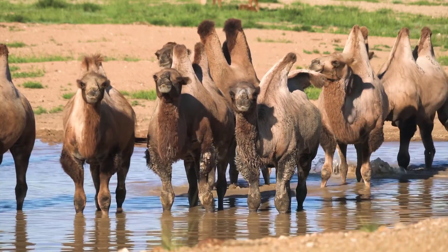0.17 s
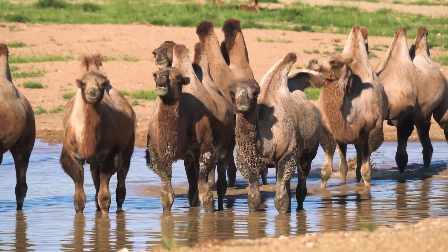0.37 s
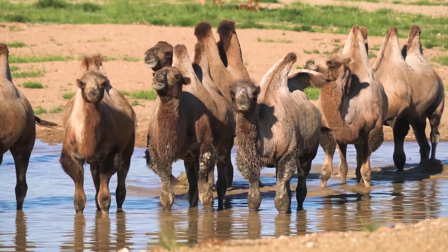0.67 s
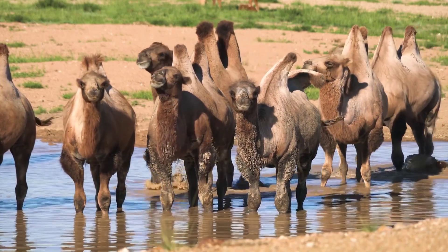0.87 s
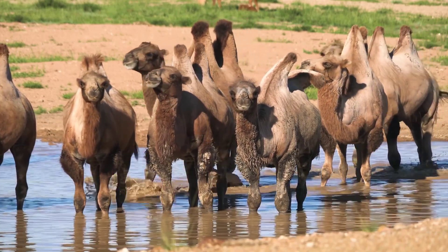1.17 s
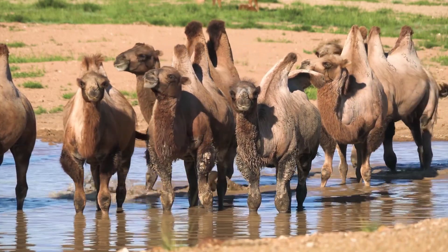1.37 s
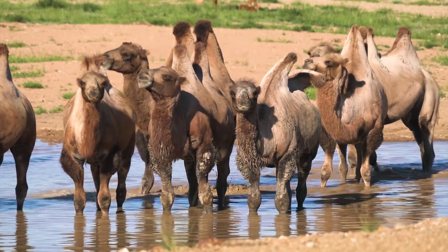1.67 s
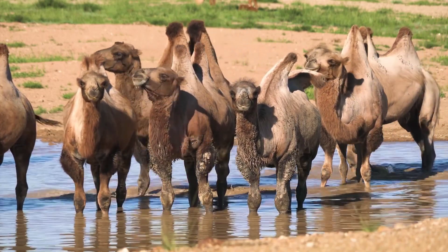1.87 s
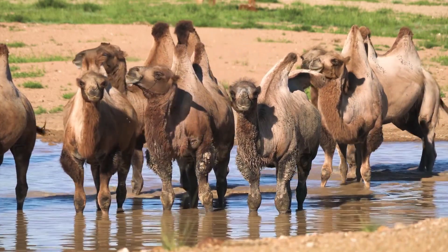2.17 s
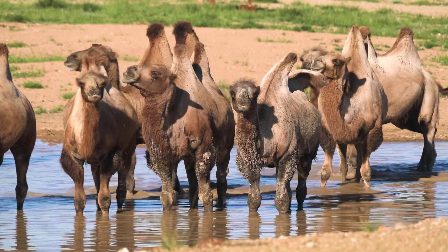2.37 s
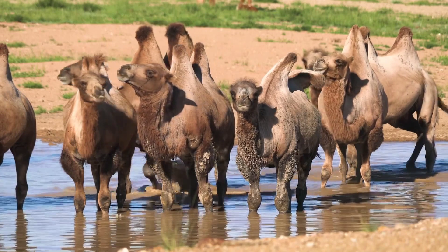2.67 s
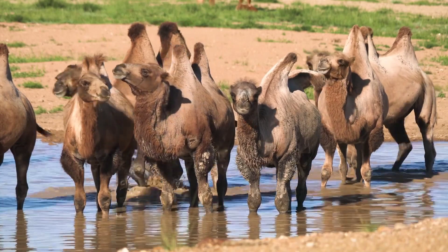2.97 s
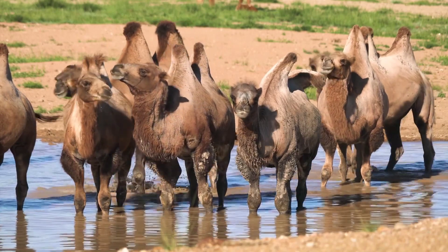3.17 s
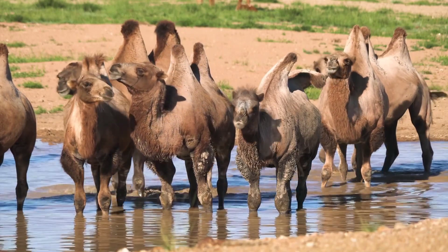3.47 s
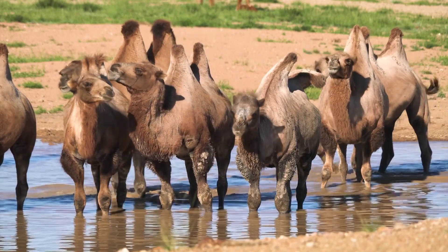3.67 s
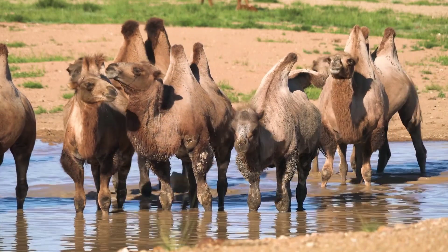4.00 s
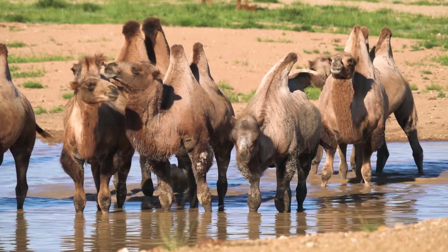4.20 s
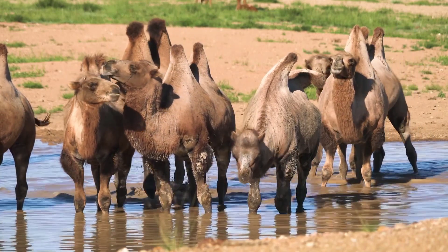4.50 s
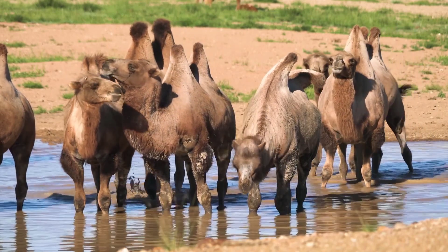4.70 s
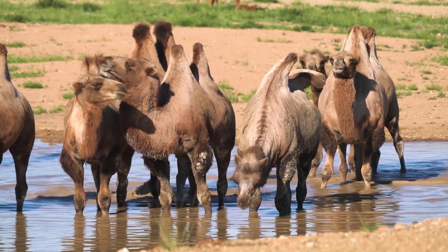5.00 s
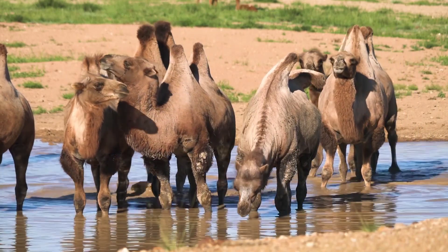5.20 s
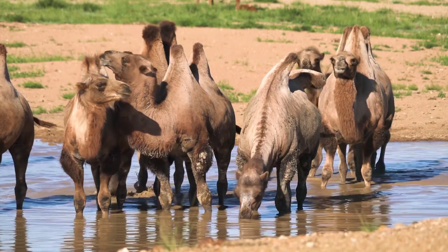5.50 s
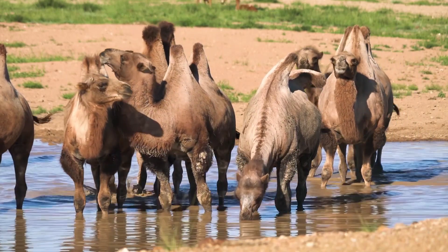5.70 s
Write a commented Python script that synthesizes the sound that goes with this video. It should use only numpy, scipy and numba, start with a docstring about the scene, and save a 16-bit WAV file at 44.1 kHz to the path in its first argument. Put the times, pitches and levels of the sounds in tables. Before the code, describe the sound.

Outdoors by shallow water, a throaty, rattling camel moan sounds three times, the first already ending, over soft low wind and grass hiss.

```python
"""A camel bellows at a watering place on open grassland: one long, gargling call, placed three times.
The first is already ending as the sound opens. Slack tissue flaps and rings throat and mouth as resonators;
it drops to an even gargle, crests in a cry sung by the second resonance and sinks as the moan runs out.
A gliding sine whistles into each bellow and gritty noise bursts rasp, insect-like, through it.
Ticks and soft bumps of shaped noise dot the pauses, over rumbling wind and a hiss of grass and water."""
import sys
import numpy as np
from scipy import signal
from scipy.fft import rfft, irfft
from scipy.io import wavfile
from scipy.ndimage import uniform_filter1d
from numba import njit

SR = 44100
rng = np.random.default_rng(int(sys.argv[2]) if len(sys.argv) > 2 else 0)


def generate_wav(sig):
    """Save sig (samples, or channels by samples) to the path in sys.argv[1] as 16-bit PCM at SR."""
    pcm = np.round(np.clip(np.atleast_2d(sig).T, -1, 1) * 32767).astype(np.int16)
    wavfile.write(sys.argv[1], SR, pcm)


N = 257984
TIME = np.arange(N) / SR

# How far each bellow is moved in time. Each entry: shift in seconds.
BELLOW_SHIFTS = [-2.5, 0, 2.5252]
# Throat shape. Each row: time in seconds, first resonance in Hz, second resonance in Hz, mouth opening 0-1.
THROAT = [(1.24, 355, 959, 1), (1.285, 357.9, 899.6, 0.7), (1.33, 385.3, 750, 0.26),
          (1.432, 365.2, 770, 0.03), (1.50, 395.8, 790, 0.14), (1.572, 391.8, 799.8, 0.18),
          (1.60, 309.6, 804, 0.22), (1.72, 319, 818.5, 0.19), (1.841, 333, 836.8, 0),
          (1.96, 334.2, 856.2, 0.12), (2.092, 325.2, 873.2, 0.21), (2.22, 316.2, 813.6, 0.63),
          (2.321, 310.3, 781.3, 0.55), (2.521, 291.9, 735.7, 0.67), (2.616, 235.9, 655, 0.86),
          (2.682, 184.4, 603, 0.8), (2.761, 149, 570, 0.4)]
# The hardest slaps of the tissue. Each row: time in seconds, force in dB.
HARD_SLAPS = [(1.317, -0.5), (1.365, 6.5), (1.425, 4), (1.540, 8), (1.552, 4), (1.564, 9), (1.584, 7),
              (1.628, 2.5), (1.650, 6.5), (1.680, 4.5), (1.695, 10), (1.702, 5), (1.717, 13), (1.783, 4.5),
              (1.804, 1), (1.927, 5.5), (1.952, 4), (1.984, 2), (2.025, 5), (2.118, 4.5), (2.136, 3.5),
              (2.202, 4), (2.229, 5), (2.268, 5), (2.285, 2.5), (2.371, 6), (2.454, 3), (2.512, 5),
              (2.575, 3), (2.649, 6.5), (2.684, 3)]
# Resonances of the moan. Each row: multiple of the first resonance, width in Hz before damping,
# level in dB with the mouth nearly shut, level in dB with it open.
MOAN_MODES = [(0.549, 52.2, -32, -25.5), (0.773, 42.2, -0.5, -23), (0.997, 78.2, -0.5, 25),
              (1.197, 74, -4.5, 7.5), (1.432, 76.3, -9.5, 2.5)]
# Resonances of the bark. Each row: multiple of the second resonance, width in Hz before damping, level in dB.
BARK_MODES = [(0.8, 64.9, 4.5), (0.952, 55, 5), (1.027, 48.8, -0.5)]
# Mouth resonances before they move with the throat. Each row: centre in Hz, width in Hz,
# level in dB with the mouth nearly shut, level in dB with it open.
MOUTH_MODES = [(1110, 296, 15.5, 2.5), (1334, 240, -1.5, 2), (1516, 128, -19.5, 17), (1647, 320, 3, -9.5),
               (1844, 100, -13, -0.5), (2206, 170, -38.5, 28), (2380, 170, 7.5, -18.5),
               (2530, 400, 4.5, -9.5)]
# Colour of air rushing through the mouth. Each row: frequency in Hz, relative level in dB.
AIR_COLOUR = [(2200, 6.5), (2600, 9.5), (3100, 6.5), (3700, -12), (4200, -21.5), (5000, 3), (6100, 0.5),
              (7000, -53), (8500, -2.5), (10300, -20)]
# Surges of breath, each with a lull on either side. Each row: time in seconds, level in dB, half width in seconds.
SURGES = [(1.281, 0, 0.0098), (1.326, 4, 0.013), (1.412, 2.5, 0.056), (1.572, 7.5, 0.027),
          (1.703, 3.5, 0.075), (1.803, 2.5, 0.035), (1.941, 2, 0.041), (2.131, 3.5, 0.012),
          (2.318, 1.5, 0.073), (2.621, 5, 0.0067)]
# Low hums of chest and throat. Each row: start in seconds, end in seconds, pitch in Hz, level in dB,
# relative waver of the pitch.
HUMS = [(1.195, 1.342, 192.7, -42, 0.03), (1.288, 1.448, 131, -35.5, 0.037),
        (2.2, 2.66, 105.5, -41.5, 0.055)]
# Thin whistle. Each row: time in seconds, pitch in Hz, level in dB.
WHISTLE = [(1.187, 2380, -43), (1.207, 2210, -48.5), (1.238, 1987, -43.5), (1.28, 2050, -44.5),
           (1.32, 1995, -44), (1.355, 1930, -47)]
# Dry rasps. Each row: peak time in seconds, level in dB without the sharp crest, swell and fade time in seconds.
RASPS = [(1.276, -36.5, 0.013), (1.461, -42.5, 0.022), (1.651, -39, 0.022), (1.843, -41.5, 0.017),
         (2.076, -44, 0.022), (2.384, -47.5, 0.058), (2.613, -41.5, 0.014), (2.831, -40, 0.0095)]
# Colour of the rasps. Each row: frequency in Hz, relative level in dB.
RASP_COLOUR = [(1200, -13), (2200, 5.5), (3000, 0.5), (3800, 0), (5000, 7.5), (6500, -2), (8300, 3.5),
               (9400, 0.5), (10300, -9)]
# Small sharp ticks. Each row: time in seconds, level in dB, decay in seconds, left minus right in dB.
TICKS = [(0.9457, -29, 0.002, 4), (1.0479, -36.5, 0.004, 5), (3.4465, -30.5, 0.0019, 2),
         (3.546, -37, 0.0048, 6)]
# Colour of the ticks. Each row: frequency in Hz, relative level in dB.
TICK_COLOUR = [(470, -20), (800, 6.5), (2350, 5.5), (2640, 7), (3010, 1), (4580, 6), (10100, -13),
               (10500, -44), (13600, -52), (22000, -120)]
# Soft bumps. Each row: time in seconds, level in dB, swell of the brush before it in seconds,
# left minus right in dB.
BUMPS = [(1.165, -23.5, 0.02, 0.5), (3.665, -24, 0.02, 1.5)]
# Colour of the bumps. Each row: frequency in Hz, relative level in dB.
BUMP_COLOUR = [(24, -31), (40, 6), (264, 9), (384, -2.5), (641, 0.5), (997, -3), (1450, -21), (2980, -21),
               (3270, -31), (5340, -27), (10500, -36), (13600, -81), (22000, -120)]
# Gusts of wind. Each row: start in seconds, end in seconds, level in dB.
GUSTS = [(0.454, 1.204, -41), (1.33, 1.743, -52), (2.96, 3.717, -43.5), (3.837, 4.272, -48.5),
         (5.493, 5.95, -41.5)]
# Colour of the wind rumble. Each row: frequency in Hz, relative level in dB.
RUMBLE_COLOUR = [(20, 7.5), (35, -2.5), (65, 2), (100, -10), (160, -11.5), (300, -20), (700, -83.5)]
# Colour of grass and water. Each row: frequency in Hz, relative level in dB.
FIELD_COLOUR = [(71, -8.5), (120, -4), (231, -15), (273, -15.5), (445, -10.5), (671, -17), (1650, -24.5),
                (2140, -26.5), (3000, -29.5), (8390, -37), (10500, -41.5), (13600, -84), (22000, -120)]

# the effort: it rises into a soft murmur, holds, and lets go at the end
MURMUR_S, RELEASE_S, END_S = 1.262, 2.692, 2.78
ATTACK_DB_PER_S, RELEASE_DB_PER_S = 594, 421
MURMUR_MOAN_DB, MURMUR_BARK_DB = -10.5, -23.5  # before the first hard slap, relative to the hold
MOAN_DB, MOAN_SAG_DB_PER_S = -17, -1.77
DEEP_HZ, DEEP_DB_PER_OCTAVE = 226, -36  # a moan below this pitch hardly gets out
SURGE_LULL = 2.12
# louder as the second resonance rises; builds up after the first hard slap
BARK_DB, BARK_DB_PER_OCTAVE, BARK_SLACK_DB = -24, 24.5, -0.5
BARK_ONSET_DB, BARK_ONSET_S = -3.5, 0.05
RATTLE_DB, RATTLE_OPEN_DB, RATTLE_SLACK_DB = -36.5, 12, -2.5  # louder with an open mouth, weaker when slack
BRIGHTEN_S = 0.037  # the rattle brightens over this time after the first hard slap
# the flapping slows as the throat slackens
FIRST_HZ, SECOND_HZ, FLAP_HZ, FLAP_POWER = 329.76, 790, 109.46, 1.05  # reference resonances and flap rate
SLOWEST_FLAP_HZ = 79.64  # outside the gargle, before scatter
SCATTER, REBOUND_SWINGS, SLACK_HZ, SLACK_SPAN_HZ = 0.11, 1.106, 294.2, 66
# in the middle of the call the flapping drops to a slow, even gargle
GARGLE_START_S, GARGLE_END_S, GARGLE_EDGE_S = 1.575, 2.07, 0.027
GARGLE_HZ, THROB_S, THROB_DEPTH, THROB_SAG = 58.3, 1.714, 0.77, 0.06
# hoarseness outside the gargle: relative waver of the first resonance, flutter of its tone
HOARSE_WAVER, HOARSE_DB = 0.032, 3
# steady singing of the first resonance, relative to the flapping
SING_MURMUR_DB, SING_STRAIN_DB, SING_GARGLE_DB = -8, -12, 0
SING_DB, SING_SINK_DB, SING_DEEP_DB_PER_OCTAVE = -17, 17, -19.5  # gains as it sinks, breaks up at the bottom
# before the gargle the throat is strained: it rings shorter and lets more of the low moan out
STRAIN_DAMPING, STRAIN_LOW_SHARE = 0.85, 0.45
# the throat gapes before each slap and damps its ring: time, strength for any slap, extra for a hard slap
GAPE_S, GAPE, HARD_GAPE = 0.0066, 0.18, 0.99
# the cry of the second resonance, relative to the flapping; it sings again once the throat is slack
CRY_S, CRY_WIDTH_S, CRY_DB, CRY_TAIL_DB, CRY_WAVER = 2.085, 0.021, 4, -3, 0.0173
BARK_SING_DB = -5
# spittle: relative waver of the mouth resonances, flutter of their levels, spray in the slack throat (share 0-1)
SPITTLE_WAVER, SPITTLE_DB, SLACK_SPRAY = 0.025, 2.5, 0.6
DROOP_HZ = 242  # below this pitch the mouth resonances droop faster
AIR_RING_SHUT_HZ, AIR_RING_OPEN_HZ = 3710, 3183
# left minus right level: the moan drifts from right to left, the open mouth points to the left
MOAN_FROM_SIDE_DB, MOAN_SIDE_DB, MOAN_DRIFT_S = -3, 2, 0.55
BARK_SIDE_DB, RATTLE_SIDE_DB, OPEN_SIDE_DB = 0.8, -2.5, 3
HUM_EDGE_S, HUM_FLUTTER_DB = 0.012, 3
WHISTLE_FADE_S, WHISTLE_WAVER, WHISTLE_FLUTTER_DB = 0.0029, 0.0051, 1
BUMP_S, BRUSH_DB = 0.012, -8.5  # length of a bump; level of the brush relative to it
GUST_EDGE_S, CALM_DB, BUFFET_DB = 0.16, -52, 4
FIELD_DB, TOP_HZ = -47.5, 10400


def bellow():
    """Flaps and the air puffs after them ring throat and mouth; the lowest resonance partly sings by itself."""
    first, second, opening = curves(THROAT)
    rate = FLAP_HZ * (first / FIRST_HZ) ** FLAP_POWER
    gargle = hold(GARGLE_START_S, GARGLE_END_S, GARGLE_EDGE_S)
    strain = hold(THROAT[0][0], GARGLE_START_S, GARGLE_EDGE_S)
    murmur = np.clip((HARD_SLAPS[0][0] - TIME) / 0.005, 0, 1)
    slack = np.clip((SLACK_HZ - first) / SLACK_SPAN_HZ, 0, 1)
    moan_db, bark_db, rattle_db = loudness(first, second, opening, murmur, slack)

    # the air column wavers when hoarse, and swings more slowly while a throb holds the throat wide
    hoarse, throb = (1 - gargle) * (1 - slack / 2), throbbing(gargle)
    cycles = np.cumsum(first * (1 + HOARSE_WAVER * hoarse * walk(110) - THROB_SAG * (throb - 1))) / SR
    slaps, rebounds = flaps(cycles, rate, gargle)
    damping = gaping(slaps)
    pulses = slaps + rebounds
    puff = fade(pulses, decay_s=0.0062)
    turbulence = puff * rng.standard_normal(N)
    drive = pulses + undb(-28.0) * turbulence

    tone = np.cos(2 * np.pi * cycles) * throb * undb(HOARSE_DB * hoarse * walk(130)) / damping ** 0.5
    tone = cut(tone, 100, "high", order=2)
    sung = singing(first, murmur, strain, gargle) * steady(tone, 0.13)
    moan = steady(moaning(drive, first, opening, damping, strain) + sung, 0.079)
    bark = barking(drive, second, slack, damping)

    # the mouth resonances sink with the throat
    stretch = (second / SECOND_HZ) ** 0.63 * np.minimum(first / DROOP_HZ, 1) ** 0.21
    spray = SLACK_SPRAY * slack * fade(pulses, decay_s=0.012) * rng.standard_normal(N)
    wet_drive = slaps + undb(-5 - 2 * gargle) * rebounds + undb(-23) * (turbulence + spray)
    rattle = rattling(wet_drive, opening, stretch, slack)

    drift = np.exp(-np.maximum(TIME - MURMUR_S, 0) / MOAN_DRIFT_S)
    moan_side = MOAN_SIDE_DB + (MOAN_FROM_SIDE_DB - MOAN_SIDE_DB) * drift
    throat = pan(moan * undb(moan_db), moan_side, lag_s=0.00019)
    throat = throat + pan(bark * undb(bark_db), BARK_SIDE_DB + OPEN_SIDE_DB * opening)
    mouth = pan(rattle * undb(rattle_db), RATTLE_SIDE_DB + OPEN_SIDE_DB * opening)
    air = rush(opening, stretch, wet_drive, puff) * undb(rattle_db - 28 + 6.1 * opening - 1.9 * slack)

    sounding = hold(THROAT[0][0], END_S, 0.029)
    slapping = 1 - murmur  # the rattle sets in with the first hard slap
    # the bright mouth sound scatters more than the low moan
    bright = banks((mouth + air) * sounding * slapping, wet_db=-8, decay_s=0.008)
    return banks(throat * sounding + hums(), wet_db=-16.0, decay_s=0.014) + bright


def loudness(first, second, opening, murmur, slack):
    """Levels in dB of moan, bark and rattle: one surging effort, shared out by the shape of throat and mouth."""
    effort = -ATTACK_DB_PER_S * np.maximum(MURMUR_S - TIME, 0)
    effort = effort - RELEASE_DB_PER_S * np.maximum(TIME - RELEASE_S, 0)
    surge = sum(db * swell(s, width) * (1 - SURGE_LULL * ((TIME - s) / width) ** 2) for s, db, width in SURGES)
    deep = DEEP_DB_PER_OCTAVE * np.maximum(np.log2(DEEP_HZ / first), 0)
    # the moan sags slowly through the hold
    moan = MOAN_DB + MOAN_SAG_DB_PER_S * (TIME - MURMUR_S) + deep + MURMUR_MOAN_DB * murmur
    bark = BARK_DB + BARK_DB_PER_OCTAVE * np.log2(second / SECOND_HZ)
    bark = bark + BARK_SLACK_DB * slack + MURMUR_BARK_DB * murmur
    onset = np.exp(-np.maximum(TIME - HARD_SLAPS[0][0], 0) / BARK_ONSET_S)
    bark = bark + BARK_ONSET_DB * (1 - murmur) * onset
    rattle = RATTLE_DB + RATTLE_OPEN_DB * opening + RATTLE_SLACK_DB * slack
    return effort + surge + moan, effort + surge + bark, effort + surge + rattle


def flaps(cycles, rate, gargle, force_db=2.0, bounce_db=-9, gargle_bounce_db=-2, slip_s=0.00035):
    """Slack tissue slaps on about every third air-column swing, in the gargle once a throb; it rebounds twice."""
    slaps, rebounds, t = np.zeros(N), np.zeros(N), THROAT[0][0]
    hard = list(HARD_SLAPS)
    for gap, size, slip, *bounces in rng.standard_normal((400, 7)):
        if t > THROAT[-1][0]:
            break
        i = int(t * SR)
        swing, gargling = np.round(cycles[i]), gargle[i] > 0.5
        t, force = np.interp(swing, cycles, TIME) + slip_s * slip, undb(force_db * min(size, 1))
        # a hard slap takes the place of the nearest flap
        if hard and hard[0][0] - t < 0.6 / (GARGLE_HZ if gargling else rate[i]):
            t, db = hard.pop(0)
            force, swing = undb(db), cycles[int(t * SR)]
        slaps[int(t * SR)] += force

        step_db, spread_db = (gargle_bounce_db, 1.5) if gargling else (bounce_db, 3.3)
        for k, (lag, rebound) in enumerate(np.reshape(bounces, (2, 2)), 1):
            at = np.interp(swing + k * REBOUND_SWINGS, cycles, TIME) + slip_s * lag
            bounce = undb(k * step_db + spread_db * min(rebound, 0.5))
            rebounds[int(at * SR)] += min(force, np.sqrt(force)) * bounce

        if gargling:  # on to the next even beat
            t = THROB_S + (np.round((t - THROB_S) * GARGLE_HZ) + 1) / GARGLE_HZ
        else:
            t += np.exp(SCATTER * gap) / max(rate[i], SLOWEST_FLAP_HZ)
    return slaps, rebounds


def gaping(slaps):
    """The throat gapes just before each slap, which damps its ring; a hard slap follows a brief hush."""
    hard = np.bincount([int(s * SR) for s, db in HARD_SLAPS], minlength=N)
    # run backwards, the decaying tail becomes a rise into the slap
    gape = fade((GAPE * slaps + HARD_GAPE * hard)[::-1], GAPE_S)[::-1]
    return 1 + uniform_filter1d(gape, size=24)


def throbbing(gargle, lag_s=0.0063):
    """In the gargle a heavy fold opens and shuts the throat at an even beat, widest just after the beat."""
    return 1 + THROB_DEPTH * gargle * np.cos(2 * np.pi * GARGLE_HZ * (TIME - THROB_S - lag_s))


def moaning(drive, first, opening, damping, strain):
    """The flaps ring the modes around the first resonance; strain shortens the ring."""
    moan = 0
    for multiple, width, shut, wide in MOAN_MODES:
        ring = resonate(drive, multiple * first, width * (damping + STRAIN_DAMPING * strain))
        moan = moan + undb(shut + (wide - shut) * opening) * ring
    # the lowest part gets out only as the mouth opens or the throat strains
    low = np.maximum(opening, STRAIN_LOW_SHARE * strain)
    moan = low * cut(moan, 163, "high", order=3) + (1 - low) * cut(moan, 352, "high", order=3)
    return steady(cut(moan, 473, "low", order=2), 0.02)


def singing(first, murmur, strain, gargle, sink_hz=75):
    """Strength of the throat's own tone: clear in murmur and gargle, faint under strain, back as the moan sinks."""
    sunk = np.clip((FIRST_HZ - first) / sink_hz, 0, 1)
    deep = np.maximum(np.log2(DEEP_HZ / first), 0)
    staged = undb(SING_MURMUR_DB) * murmur + undb(SING_STRAIN_DB) * strain + undb(SING_GARGLE_DB) * gargle
    return staged + undb(SING_DB + SING_SINK_DB * sunk + SING_DEEP_DB_PER_OCTAVE * deep)


def barking(drive, second, slack, damping):
    """The flaps ring the modes around the second resonance, which also breaks into a cry."""
    bark = sum(undb(db) * resonate(drive, k * second, w * damping ** 0.7) for k, w, db in BARK_MODES)
    bark = steady(cut(cut(bark, 380, "high", order=2), 1140, "low", order=4), 0.11)
    return steady(bark + crying(second, slack) / damping, 0.045)


def crying(second, slack):
    """The second resonance breaks into a wavering cry at the crest and keeps singing softly as it falls."""
    strength = undb(CRY_DB) * swell(CRY_S, CRY_WIDTH_S)
    strength = strength + undb(CRY_TAIL_DB) * hold(CRY_S, END_S, CRY_WIDTH_S) + undb(BARK_SING_DB) * slack
    return strength * sine(second * (1 + CRY_WAVER * walk(120)))


def rattling(wet_drive, opening, stretch, slack):
    """Slaps ring the mouth resonances, and spittle makes their pitches and levels waver."""
    rattle = 0
    for hz, width, shut, wide in MOUTH_MODES:
        gain = undb(shut + (wide - shut) * opening + SPITTLE_DB * walk(60))
        centre = hz * stretch * (1 + SPITTLE_WAVER * walk(70))
        rattle = rattle + gain * resonate(wet_drive, centre, np.full(N, float(width)))
    rattle = steady(cut(cut(rattle, 975, "high", order=2), 2097, "low", order=6), 0.057)
    # the first flaps, and the slow, slack ones at the end, sound duller
    dull = np.maximum(slack, np.clip(1 - (TIME - HARD_SLAPS[0][0]) / BRIGHTEN_S, 0, 1))
    return (1 - dull) * rattle + dull * cut(rattle, 1480, "low", order=2)


def rush(opening, stretch, drive, puff, ring_width_hz=230, ring_db=-5, ring_open_db=7,
         lower_share=0.86, lower_db=-4):
    """Air hisses with each puff; flaps ring two wavering resonances that sink with jaw and throat."""
    hz = (AIR_RING_SHUT_HZ + (AIR_RING_OPEN_HZ - AIR_RING_SHUT_HZ) * opening) * stretch ** 0.45
    width = np.full(N, float(ring_width_hz))
    ring = 0
    for share, db in [(1, 0), (lower_share, lower_db)]:
        centre = share * hz * (1 + 0.012 * walk(45))
        ring = ring + undb(db) * unit(resonate(resonate(drive, centre, width), centre, width))
    hiss = noise(AIR_COLOUR, -23.5) * steady(np.sqrt(np.abs(puff) + 0.05), 0.24)
    return hiss + undb(ring_db + ring_open_db * opening) * steady(ring, 0.13)


def hums():
    """Chest and throat hum, unsteady in pitch and strength, at the start of the bellow and in its last part."""
    total = 0
    for start, end, hz, db, waver in HUMS:
        level = undb(db + HUM_FLUTTER_DB * np.minimum(walk(45), 1))
        total = total + sine(hz * (1 + waver * walk(70))) * level * hold(start, end, HUM_EDGE_S)
    return total


def whistle():
    """A thin, wavering tone drops and levels out as it leads into the bellow."""
    hz, db = curves(WHISTLE)
    level = undb(db + WHISTLE_FLUTTER_DB * walk(120)) * hold(WHISTLE[0][0], WHISTLE[-1][0], WHISTLE_FADE_S)
    return sine(hz * (1 + WHISTLE_WAVER * walk(180))) * level


def rasps(crest=0.3, crest_s=0.0022, grain_db=3.5):
    """Short hisses of fine, crisp grains swell to a sharp crest and fade, four or five times a second."""
    shape = 0
    for s, db, span in RASPS:
        away = np.abs(TIME - s)
        shape = shape + undb(db) * (np.exp(-away / span) + crest * np.exp(-away / crest_s))
    grains = unit(undb(2.3 * np.minimum(walk(350), 1.6) + grain_db * np.minimum(walk(2200), 2)))
    return noise(RASP_COLOUR, -12) * shape * grains


def knocks():
    """Ticks start sharply and die away; bumps brush in softly, land and stop short."""
    ticks, bumps = 0, 0
    for s, db, decay, side in TICKS:
        ticks = ticks + pan(undb(db) * np.exp(-np.abs(TIME - s) / decay) * (TIME >= s), side)
    for s, db, brush_s, side in BUMPS:
        brush = undb(BRUSH_DB) * np.exp(-np.abs(TIME - s) / brush_s)
        bumps = bumps + pan(undb(db) * np.where(TIME < s, brush, TIME < s + BUMP_S), side)
    return ticks * noise(TICK_COLOUR, -1.5) + bumps * noise(BUMP_COLOUR, -4.5)


def banks(x, wet_db, decay_s):
    """Water, banks and the herd scatter a brief, weak echo, different on each side."""
    t = TIME[:SR // 5]
    echo = rng.standard_normal((2, len(t))) * np.exp(-t / decay_s) * (t > 0.002)
    echo /= np.sqrt(np.sum(echo ** 2, axis=1, keepdims=True))
    return x + undb(wet_db) * signal.fftconvolve(x, echo, axes=1)[:, :N]


def outdoors():
    """Gusts buffet the microphone over an even hiss of grass and water."""
    wind = undb(CALM_DB) + sum(undb(db) * hold(start, end, GUST_EDGE_S) for start, end, db in GUSTS)
    rumble = noise(RUMBLE_COLOUR, -9.5) * wind * undb(BUFFET_DB * np.minimum(walk(25), 1.5) - 2.5)
    field = noise(FIELD_COLOUR, -4.0) * undb(FIELD_DB + 0.29 * walk(8.1))
    return rumble + field * undb([[-0.7], [0.7]])  # the hiss leans to the right


@njit
def resonate(x, hz, width):
    """Band-pass with a moving centre and width; a wider band only damps the ring faster."""
    y, band, low = np.zeros(len(x)), 0., 0.
    for i in range(len(x)):
        if x[i] == 0 and abs(band) + abs(low) < 1e-12:
            continue
        g, k = np.tan(np.pi * hz[i] / SR), width[i] / hz[i]
        v = (band + g * (x[i] - low)) / (1 + g * (g + k))
        band, low, y[i] = 2 * v - band, low + 2 * g * v, v / hz[i]
    return y


def undb(db):
    """Decibels to gain."""
    return 10 ** (np.asarray(db) / 20)


def curves(table):
    """The columns of a table, joined by straight lines in time."""
    s, *columns = np.transpose(table)
    return [np.interp(TIME, s, c) for c in columns]


def unit(x):
    """Scale to rms 1."""
    return x / np.sqrt(np.mean(x ** 2))


def steady(x, span_s):
    """Hold the running rms near 1, leaving faster throbs alone."""
    k = max(int(span_s * SR), 8)
    power = uniform_filter1d(uniform_filter1d(x ** 2, k), k)
    return x / np.sqrt(np.abs(power) + 1e-4 * np.mean(x ** 2))


def pan(x, db, lag_s=0):
    """Place a sound by its left minus right level and by how late it reaches the left side."""
    sides = np.array([np.interp(TIME - lag_s, TIME, x), x])
    return sides * undb(np.array([db, -db]).reshape(2, -1) / 2)


def walk(rate):
    """Smooth random wandering with a spread near 1."""
    k = int(SR / rate)
    steps = np.repeat(rng.standard_normal(N // k + 1), k)
    return unit(uniform_filter1d(steps, k)[:N])


def cut(x, hz, kind, order):
    """Low-pass or high-pass that shifts nothing in time."""
    sos = signal.butter(order, min(hz, SR / 3), kind, fs=SR, output="sos")
    return signal.sosfiltfilt(sos, x + 1e-18)


def noise(colour, side_db):
    """Stereo noise of rms 1 with a spectrum of frequency and level points, as wide as its side level."""
    hz, db = np.transpose(colour)
    f = np.arange(N // 2 + 1) * SR / N
    gain = undb(np.interp(np.log(f + 1), np.log(hz), db)) * np.minimum(f / hz[0], 1) ** 2
    mid, side = irfft(rfft(rng.standard_normal((2, N))) * gain, N)
    return unit(mid + undb(side_db) * np.array([side, -side]))


def fade(x, decay_s):
    """Give every pulse an exponential tail."""
    return signal.lfilter([1], [1, -np.exp(-1 / (SR * decay_s))], x + 1e-18)


def hold(start, end, edge_s):
    """Rise, stay at 1 and fall again between two times."""
    return np.clip(np.minimum(TIME - start, end - TIME) / edge_s, 0, 1)


def swell(s, width_s):
    """A smooth hump of height 1 around a time."""
    return np.exp(-((TIME - s) / width_s) ** 2)


def sine(hz):
    """A tone of rms 1 along a pitch curve."""
    return np.sqrt(2) * np.sin(2 * np.pi * np.cumsum(hz) / SR)


def scene():
    """The bellow with its whistle and rasps, placed three times over the open field."""
    call = bellow() + whistle() + rasps()
    calls = 0
    for shift in np.round(np.array(BELLOW_SHIFTS) * SR) / SR:  # whole samples
        calls = calls + np.array([np.interp(TIME - shift, TIME, side, left=0, right=0) for side in call])
    return calls + knocks() + outdoors()


def record(dry):
    """The recorder cuts the top steeply."""
    return signal.sosfilt(signal.ellip(10, 0.2, 70, TOP_HZ, fs=SR, output="sos"), dry)


dry = scene()
out = record(dry)
generate_wav(out)
```